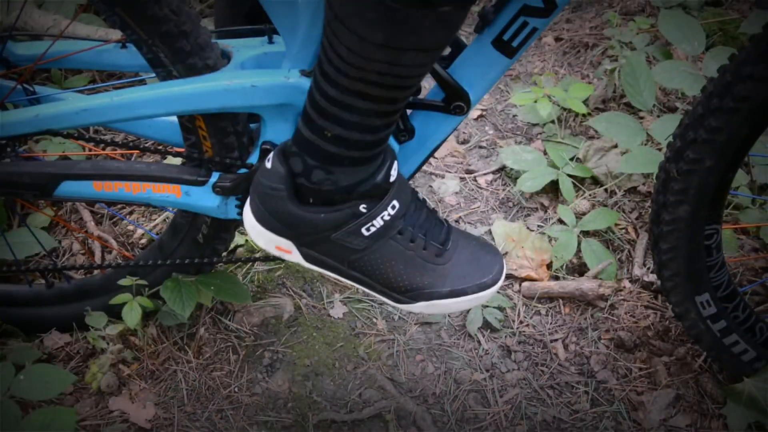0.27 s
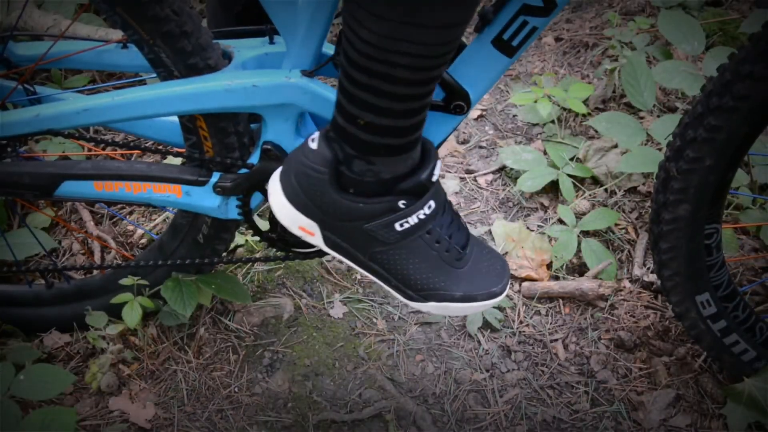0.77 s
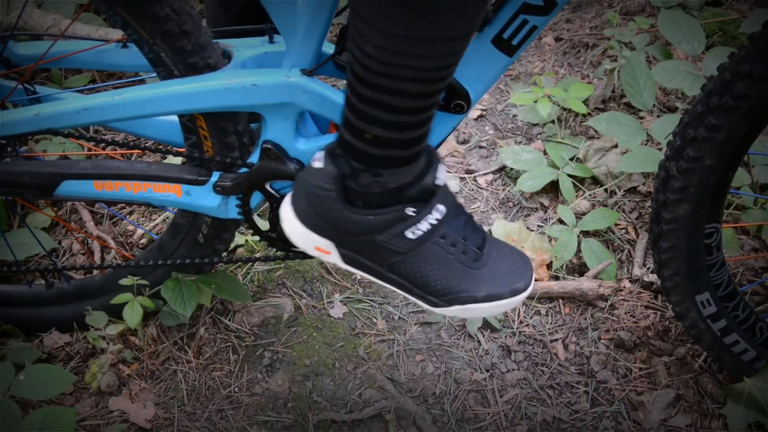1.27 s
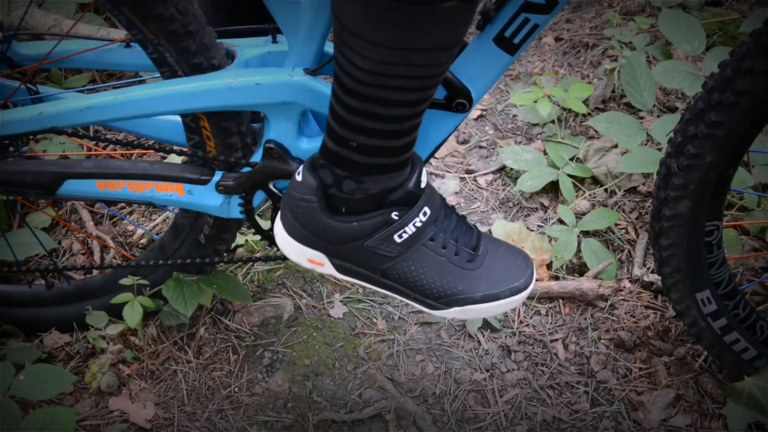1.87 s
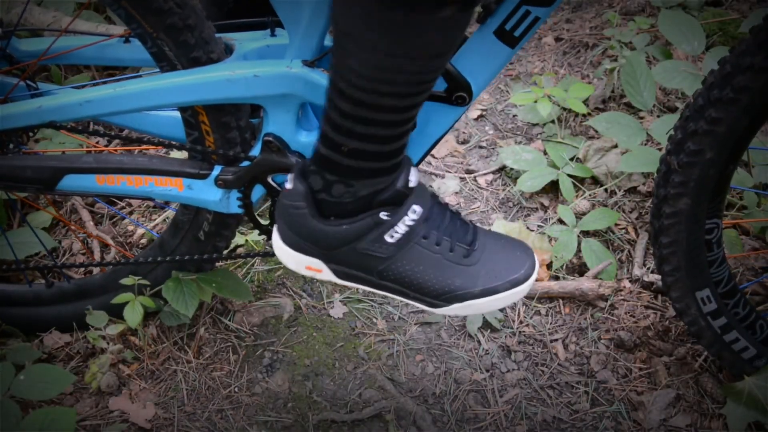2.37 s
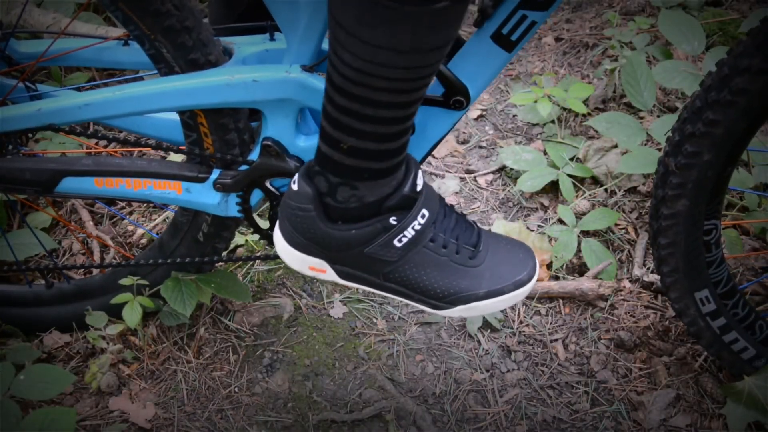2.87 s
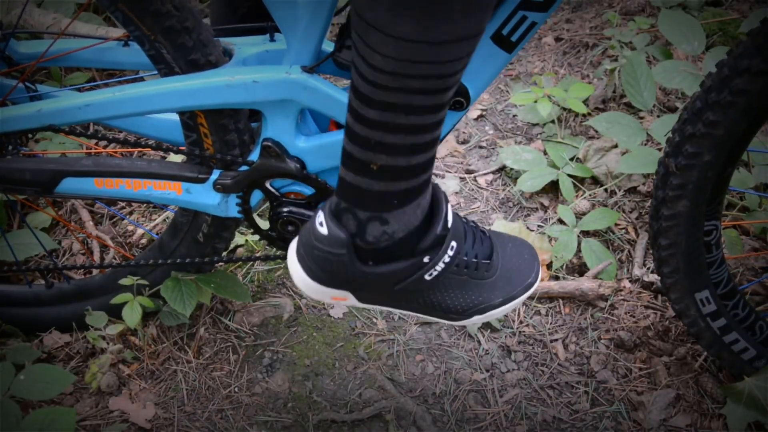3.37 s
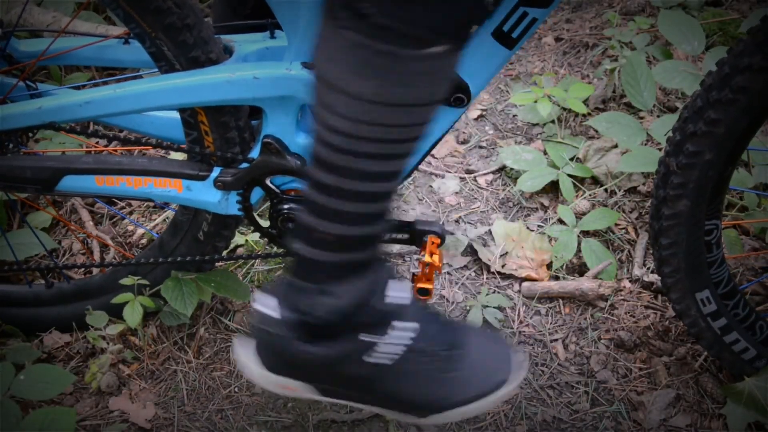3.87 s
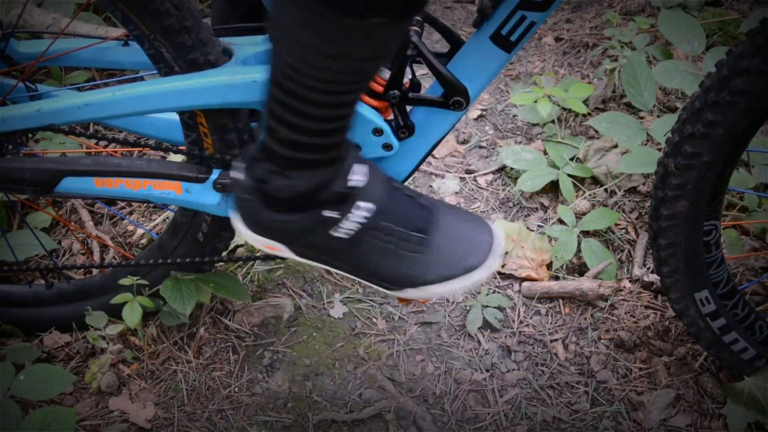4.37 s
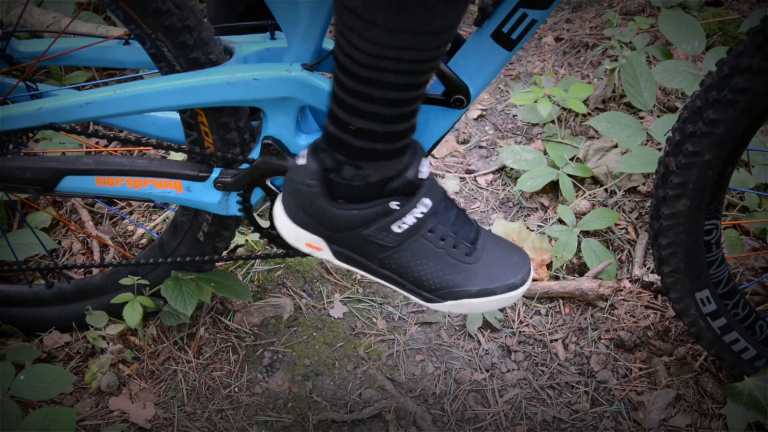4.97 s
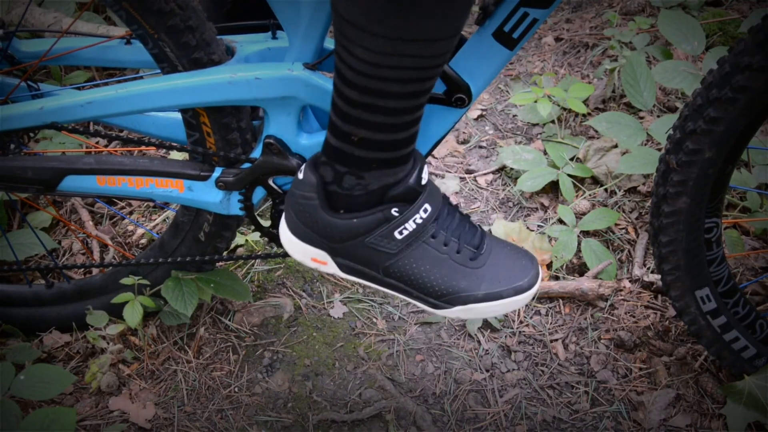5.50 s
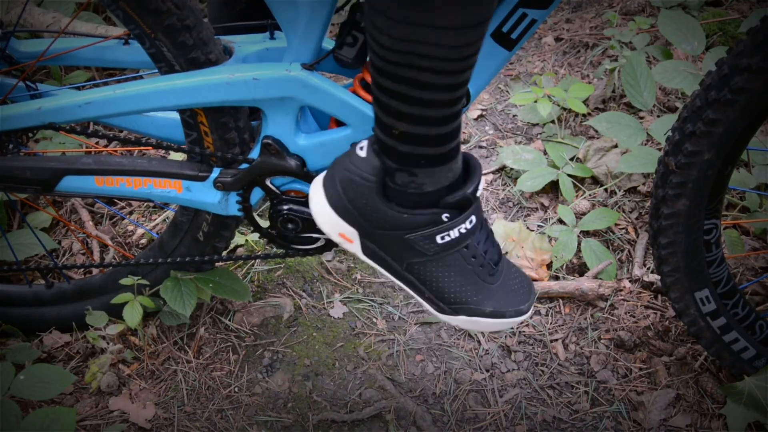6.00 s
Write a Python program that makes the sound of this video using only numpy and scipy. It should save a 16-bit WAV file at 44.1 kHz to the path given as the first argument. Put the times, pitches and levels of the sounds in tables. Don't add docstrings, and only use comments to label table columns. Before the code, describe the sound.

Close stereo view of a bicycle pedal in the woods. A few faint ratchet clicks, small clacks as the shoe feels for the pedal, then a hard snap as it clips in. After a pause, a very loud bright crack on release, a short hub rattle, more fumbling knocks and another firm snap. Soft distant traffic and light leaf hiss lie underneath.

```python
import sys
import numpy as np
from scipy import signal
from scipy.fft import rfft, irfft
from scipy.io import wavfile
from scipy.ndimage import uniform_filter1d

SR = 44100
rng = np.random.default_rng(int(sys.argv[2]) if len(sys.argv) > 2 else 0)


def volts(x):
    e = np.asarray(x, float) / 20
    return 10 ** e


def waveform_to_disk(signal):
    frames = np.transpose(np.atleast_2d(signal))
    scaled = np.clip(frames, -1, 1) * 32767
    samples = np.round(scaled).astype(np.int16)
    wavfile.write(sys.argv[1], SR, samples)


N = 275184

# [f/Hz, bandwidth/Hz, level/dB]
BODY = [(1437.1, 220, -1), (1648.1, 180, -1), (2087.9, 1000, -9.5), (2600, 370, -1.5), (3000, 450, 5.5),
        (3248.6, 980, -12.5), (2200, 2400, -1)]
# [f/Hz, bandwidth/Hz, level/dB]
STEEL = [(4600, 400, -12), (5420, 260, -6), (6280, 400, -10), (7100, 400, -12), (8200, 400, -11),
         (8550, 350, -9), (10400, 450, -11), (11170, 350, -7), (12400, 500, -13), (13570, 450, -13)]
# [f/Hz, bandwidth/Hz, level/dB]
CRACK = [(4933, 3659.5, -3), (7499.7, 3600, -7), (9316.7, 3000, -4), (12098, 2982.7, -5.5),
         (14310, 2500, -13)]


def read(points, hz):
    f, value = np.transpose(points)
    return np.interp(np.log(hz + 1), np.log(f + 1), value)


def add(mix, s, sound):
    part = mix[round(s * SR):][:len(sound)]
    part += sound[:len(part)]


def air_db(steady_db, name, gusts=()):
    fade_in_s = (0.1701, 0.86813)
    fade_db = {"traffic": -14, "leaves": -8, "rumble": -9}
    t = np.arange(N) / SR
    swell = sum(db * np.exp(-((t - s) / half) ** 2) for s, half, db in gusts)
    return steady_db + np.interp(t, fade_in_s, (fade_db[name], 0)) + swell


def rumble():
    # [f/Hz, level/dB per Hz]
    rumble_density = [(20, -31), (40, -22.5), (62, 1.5), (78, -6), (120, -1.5), (170, -9), (230, -13.5),
                      (400, -37.5)]
    shape = volts(read(rumble_density, np.fft.rfftfreq(N, 1 / SR)))
    common, difference = irfft(rfft(rng.standard_normal((2, N))) * shape, N)
    pair = np.array([common + .07 * difference, common - .07 * difference]) / common.std()
    return volts(air_db(-70, "rumble") + 2.0) * pair


def hiss(shape, level_db, band_hz, patchy_db, flicker_db):
    # [f/Hz, coherence/1]
    coherence = [(60, 0.98635), (130, 0.94), (290, 0.9867), (640, 0.9808), (1410, 0.96028), (3100, 0.66),
                 (6820, 0.62), (15000, 0.24)]
    frames, hz = N // 256 + 5, np.fft.rfftfreq(1024, 1 / SR)
    a, b, c, d, patches = rng.standard_normal((frames, 513, 5)).T
    patches = uniform_filter1d(uniform_filter1d(patches, size=12, axis=0), size=10, axis=1)
    flicker = uniform_filter1d(rng.standard_normal(frames), size=4) * 2
    same = np.clip(read(coherence, hz), -1, 1)[:, None]
    left = a + 1j * b
    right = same * left + np.sqrt(1 - same ** 2) * (c + 1j * d)
    power = volts(read(shape, hz)) ** 2 * (hz < shape[-1][0])
    power /= power[(hz > band_hz[0]) & (hz < band_hz[1])].sum()
    z = np.array([left, right]) * np.sqrt(power)[:, None]
    z *= volts(patchy_db * patches / patches.std() + flicker_db * flicker)
    noise = signal.istft(z, nperseg=1024, noverlap=768)[1][:, :N]
    return volts(level_db) * noise * 0.63657


def traffic():
    # [f/Hz, level/dB per Hz]
    traffic_density = [(100, -48.5), (170, -20), (270, -16.5), (300, -18.5), (398, -11.5), (435, -12),
                       (469, -10.5), (544, -8.5), (1000, -1.5), (1900, -12.5), (2530, -21.5), (6000, -42),
                       (7800, -64.5), (13200, -120)]
    level_db = air_db(-42.5, "traffic")
    return hiss(traffic_density, level_db, band_hz=(500, 1800), patchy_db=0.7267, flicker_db=0.8586)


def leaves():
    # [f/Hz, level/dB per Hz]
    leaf_density = [(1500, -33.5), (3000, 2), (5000, -2), (7000, 0), (8600, -1), (10000, -3.5), (13000, -6),
                    (15300, -8), (15750, -34)]
    # [middle t/s, half length/s, level over calm/dB]
    gusts = [
        (0.018, 0.0829, 7),
        (1.603, 0.1875, 6.5),
        (2.245, 0.348, 6),
        (3.317, 0.09355, 8),
        (3.535, 0.06953, 5.5),
        (3.958, .3, 9),
        (5.456, 0.2016, 5),
        (5.849, 0.1084, 5.5),
    ]
    level_db = air_db(-68.5, "leaves", gusts)
    return hiss(leaf_density, level_db, band_hz=(5000, 15000), patchy_db=.6, flicker_db=1.1)


def woods(x, near_db=-16, far_db=-28, rise_s=0.053):
    # [f/Hz, t60/s]
    decay = [(500, 0.11), (2000, 0.32), (5000, 0.61), (9000, .45), (15000, 0.46)]
    taps = np.zeros((2, SR))
    at = np.arange(100, SR - 20, 20) + rng.integers(0, 20, (2, (SR - 101) // 20))
    np.put_along_axis(taps, at, rng.choice([-1., 1.], at.shape), 1)
    taps[1] = .85 * taps[0] + .53 * taps[1]
    t = np.arange(SR) / SR
    near = taps * volts(-60 * t / 0.082)
    hz, frame_s, z = signal.stft(taps, SR, nperseg=256)
    z = z * volts(-60 * frame_s / read(decay, hz)[:, None])
    far = signal.istft(z, SR, nperseg=256)[1][:, :SR]
    grove_s, grove_db = .07, 3
    grove = volts(grove_db * np.exp(-((t - grove_s) / 0.015) ** 2))
    far = far * np.clip(t / rise_s, 0, 1) ** 2 * grove
    tail = volts(near_db) * near / np.linalg.norm(near[0]) + volts(far_db) * far / np.linalg.norm(far[0])
    return signal.fftconvolve(x[None], tail, axes=1)[:, :N]


def ring(drive, modes, peak_db, band_hz, detune=.012):
    t = np.arange(2600) / SR
    luck = rng.standard_normal((len(modes), 2)) * (2, detune)
    response = np.zeros(len(t))
    for (hz, width, db), (luck_db, shift) in zip(modes, luck):
        decay = np.exp(-np.pi * width * t)
        response += volts(db + luck_db) * np.sqrt(width) * decay * np.sin(2 * np.pi * hz * (1 + shift) * t)
    radiated = signal.butter(3, band_hz, "band", fs=SR, output="sos")
    out = signal.sosfilt(radiated, signal.fftconvolve(drive, response))
    return volts(peak_db) * out / abs(out).max()


def chatter(lead_ms, die_ms, blow=2.5):
    ms = np.arange(700) / SR * 1000 - lead_ms
    envelope = np.where(ms < 0, 1.2 * np.exp(ms / 0.96), np.exp(-abs(ms) / max(die_ms, .1)))
    grit = rng.standard_normal(700) * (rng.random(700) < .35)
    return envelope * grit + blow * np.sinc(ms * SR / 1000)


def squeak(length, hz, tone_db, scrape_db):
    size = round(length * SR)
    waver = uniform_filter1d(rng.standard_normal(size), size=40)
    turns = np.cumsum(hz * (1 + .08 * (waver - waver.mean()))) / SR
    tone = np.sqrt(2) * (np.sin(2 * np.pi * turns) + .15 * np.sin(4 * np.pi * turns))
    band = signal.butter(1, [2200 / SR * 2, 11000 / SR * 2], "band")
    grit = signal.lfilter(*band, rng.standard_normal(size))
    envelope = signal.windows.tukey(size, .3) * volts(np.linspace(3, -7, size))
    return (volts(tone_db) * tone + volts(scrape_db) * grit) * envelope


def tick(db, hz, ms):
    return ring(chatter(0.7931, ms, blow=1.0), CRACK + [(hz, 600, 0)], db, band_hz=(1800, 15500))


def pawl(wheel_db, pawl_db, ms):
    # [f/Hz, bandwidth/Hz, level/dB]
    wheel_modes = [(1400, 48.3, -9), (1666, 218.7, -0.5), (2000, 333, -10), (2853.6, 121.6, 3.5),
                   (3665.3, 431, -5), (4522, 481, -14.5), (2650, 1597, -22)]
    # [f/Hz, bandwidth/Hz, level/dB]
    pawl_modes = [(5265.4, 219.2, -7), (6587.4, 301, -0.5), (7509.3, 593.5, 10), (8509.7, 280, 7),
                  (10420, 550, -21.5), (13643, 530, -8.5)]
    drive = chatter(.3, ms, blow=2.5765)
    wheel = ring(drive, wheel_modes, wheel_db, band_hz=(1100, 6000))
    return wheel + ring(drive, pawl_modes + CRACK, pawl_db, band_hz=(3800, 15500))


def release(body_db, frame_db, steel_db):
    # [f/Hz, bandwidth/Hz, level/dB]
    free_jaws = [(5420, 70, -4), (8540, 120, -12), (11170, 120, -10)]
    # [f/Hz, bandwidth/Hz, level/dB]
    frame_modes = [(130, 120, -31), (228.6, 140, -21), (369.78, 140, -4.5), (560.5, 110, 4.5),
                   (752.4, 970, -5.5)]
    slam_ms = 2.2
    front = chatter(.3, 1.8954, blow=2.2)
    rear = np.roll(chatter(0.22, slam_ms, blow=1.1), 75)
    steel_modes = STEEL + CRACK + free_jaws
    steel = ring(front + 0.52 * rear, steel_modes, steel_db - 0.5, band_hz=(3500, 13000), detune=.002)
    body_drive = chatter(0.33, slam_ms, blow=1.6)
    body = ring(body_drive, BODY + [(1696, 370, 7)], body_db - 2.5, band_hz=(900, 4500))
    frame = ring(chatter(0.1, 0.95, blow=4.5), frame_modes, frame_db + 14.0, band_hz=(150, 1300))
    return body + steel + frame


def knock(body_db, sole_db, steel_db, body_hz):
    # [f/Hz, bandwidth/Hz, level/dB]
    sole_modes = [(340, 50, -7), (450, 60, -6), (525, 50, -3), (610, 50, 0), (700, 60, -2), (810, 110, -5),
                  (1000, 250, 1)]
    steel_modes = STEEL + CRACK + [(6900, 450, 6.5)]
    steel = ring(chatter(1.2, 2.5, blow=1.3), steel_modes, steel_db - 4.5, band_hz=(4200, 15000))
    body_modes = BODY + [(body_hz, 800, 11)]
    body = ring(chatter(1.2, 1.4, blow=6.938), body_modes, body_db, band_hz=(1000, 4500))
    sole = ring(chatter(0.15, 8.8, blow=6.9), sole_modes, sole_db + 2.0, band_hz=(330, 1200))
    return body + sole + steel


def scene():
    # [t/s, body peak level/dB, sole peak level/dB, steel peak level/dB, loudest body f/Hz]
    knocks = [(0.2221, -40, -49, -59, 1400), (0.2412, -20, -42, -50, 2200),
              (1.1947, -32.5, -32.5, -42, 1200), (1.2058, -19.5, -36, -30, 2803),
              (1.2245, -20.5, -30.5, -24, 3290), (1.2282, -30.5, -34.5, -49, 1420),
              (2.1295, -15.5, -21, -27, 2490), (2.1405, -15, -29, -24.5, 2758),
              (2.15, -2, -18.5, -19, 2000), (3.7193, -20.5, -32, -40, 1400), (4.4922, -43, -45, -50, 1310),
              (4.5119, -25, -35, -36, 2320), (4.5214, -24, -30, -30, 1847),
              (4.5298, -11.5, -25, -13.5, 1323), (4.5466, -44.5, -45, -56.5, 1730),
              (4.784, -37, -42.5, -56, 1331), (4.8389, -24.5, -42.5, -36.5, 1328),
              (5.0283, -22, -40, -34, 1283), (5.3901, -25.5, -33, -30, 2420),
              (5.4161, -2, -18.5, -13.5, 3000), (5.9426, -32.5, -45.5, -44.5, 1260)]
    # [t/s, body peak level/dB, frame peak level/dB, steel peak level/dB]
    releases = [
        (3.689, -1, -29.5, 1.5),
    ]
    # [t/s, wheel peak level/dB, pawl peak level/dB, chatter/ms]
    pawls = [
        (0.0034, -55.5, -68.5, 2.577),
        (0.0074, -53.5, -54, 3.94),
        (0.0214, -51.5, -52, 4.22),
        (0.0498, -51.5, -50, 2.473),
        (0.2093, -41.5, -35.5, 4.493),
        (0.238, -36, -33.5, 2.754),
        (0.3052, -43.5, -40, 1.1374),
        (4.1063, -32, -26, 1.649),
        (4.139, -24, -32.5, 6.99),
        (4.2006, -21.5, -19, 3.412),
    ]
    # [t/s, peak level/dB, f/Hz, chatter/ms]
    ticks = [(0.1154, -63, 6430, 1.604), (0.8596, -52.5, 5174, 1.589), (1.073, -48.5, 8860, 1.6),
             (1.0909, -45, 8210, 1.61), (1.297, -31, 10960, 1.964), (1.4994, -50.5, 5210, 1.605),
             (1.8851, -49.5, 6008, 1.573), (2.0756, -46, 6620, 0.87), (2.0815, -33, 8119, 2.065),
             (2.4395, -49.5, 4992, 1.62), (3.0747, -44.5, 9470, 1.937)]
    # [t/s, length/s, f/Hz, tone rms level/dB, scrape rms level/dB]
    squeaks = [
        (1.236, 0.04213, 5950, -57, -63.5),
        (1.229, .034, 2750, -66, -51),
        (1.282, 0.01684, 5200, -67.5, -56),
        (4.513, 0.00857, 6900, -46.5, -60),
        (3.687, .0015, 8400, -60.5, -36.5),
        (4.775, 0.0124, 6497, -66.5, -67),
        (4.804, 0.01089, 7000, -65.5, -65),
    ]
    # [f/Hz, phase/rad]
    lead = [(500, 0.03), (4000, 0.11), (8000, 0.25), (12000, 0.69), (16000, 1.5)]
    bike, snap = np.zeros((2, N))
    for table, source in ((knocks, knock), (pawls, pawl), (ticks, tick), (squeaks, squeak)):
        for s, *settings in table:
            add(bike, s, source(*settings))
    s, *settings = releases[0]
    add(snap, s, release(*settings))
    turn = np.exp(.5j * read(lead, np.fft.rfftfreq(N, 1 / SR)))
    direct = irfft(rfft(bike + snap) * np.array([turn, 1 / turn]), N)
    echo = woods(bike + volts(5.0) * snap)
    return direct + echo + traffic() + leaves() + rumble()


def roll_off(x):
    return signal.sosfilt(signal.butter(12, 16530, fs=SR, output="sos"), x)


def record(dry):
    # [f/Hz, level/dB]
    balance = [(60, 1.1315), (4400, 1.4859), (8100, -0.1287), (15000, 0.9934)]
    lean = volts(read(balance, np.fft.rfftfreq(N, 1 / SR)) / 2)
    x = irfft(rfft(dry) * np.array([lean, 1 / lean]), N)
    power_db = 10 * np.log10(abs(uniform_filter1d((x ** 2).mean(0), size=200)) + 1e-12)
    fall = np.arange(N) * 240.0 / SR
    held_db = np.maximum.accumulate(power_db + fall) - fall
    over_db = np.maximum(held_db + 17, 0)
    late_db = signal.lfilter([.002], [1, -(1 - .002)], over_db)
    x = np.clip(x / volts(.45 * late_db), -.86, .86)
    x = signal.oaconvolve(x, signal.firwin(127, 15800, fs=SR)[None], "same")
    return roll_off(x)


dry = scene()
out = record(dry)
waveform_to_disk(out)
```